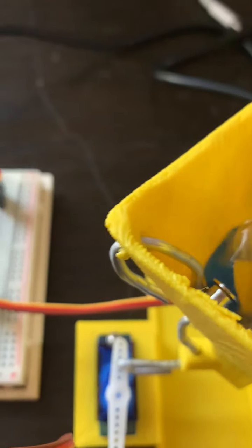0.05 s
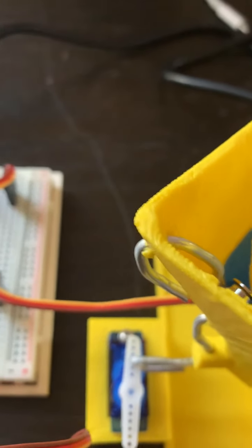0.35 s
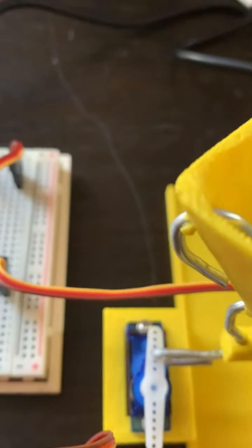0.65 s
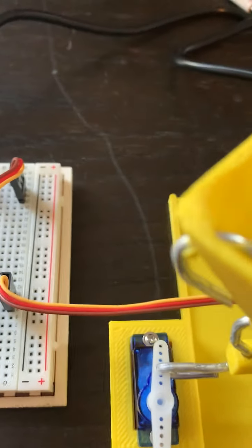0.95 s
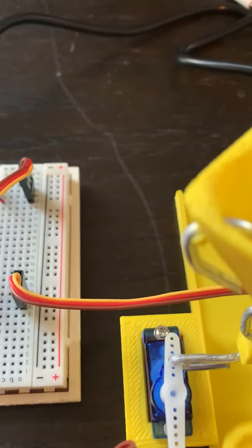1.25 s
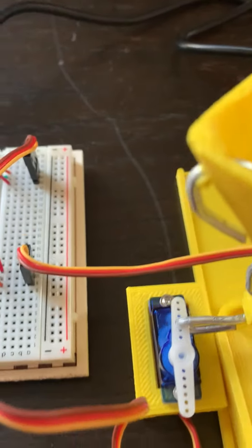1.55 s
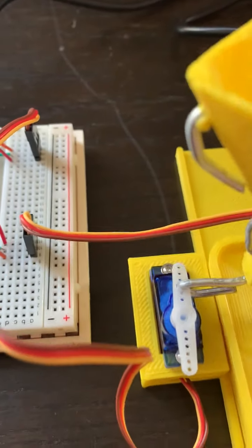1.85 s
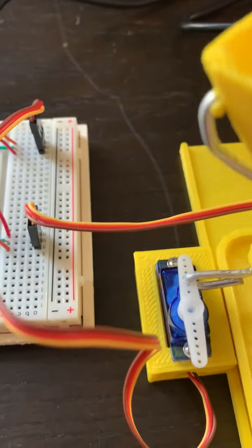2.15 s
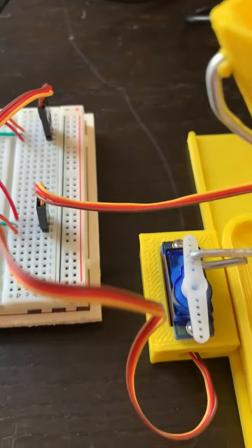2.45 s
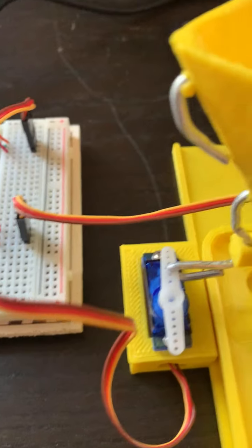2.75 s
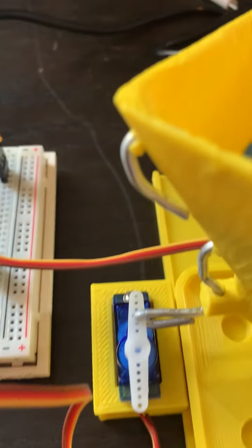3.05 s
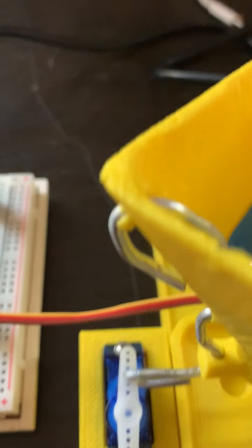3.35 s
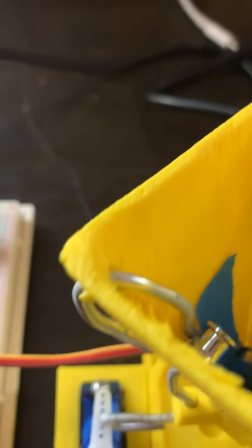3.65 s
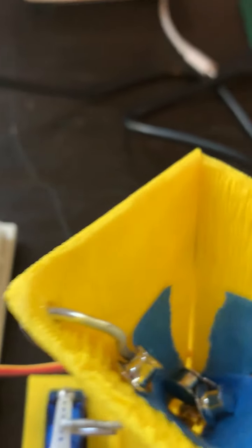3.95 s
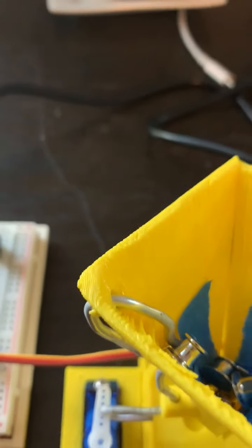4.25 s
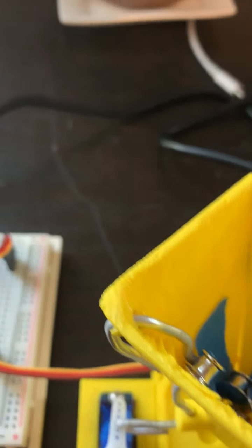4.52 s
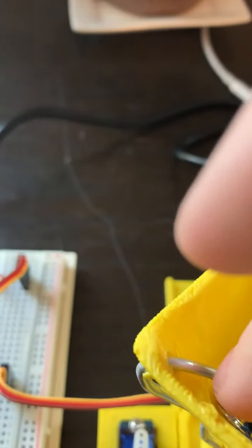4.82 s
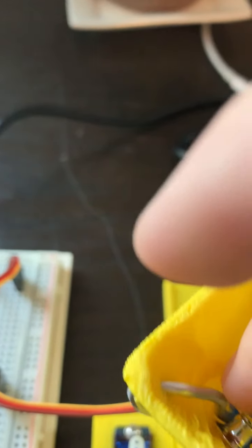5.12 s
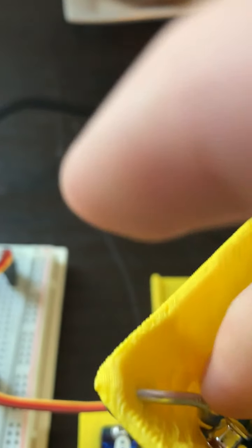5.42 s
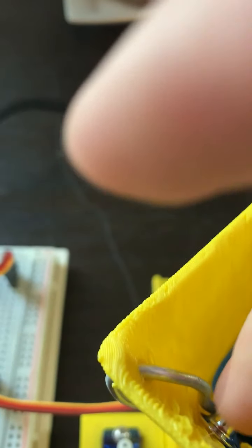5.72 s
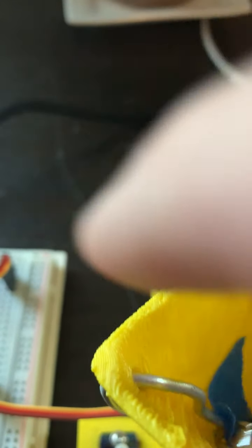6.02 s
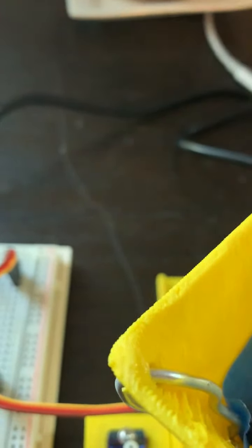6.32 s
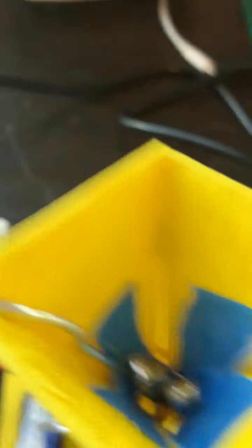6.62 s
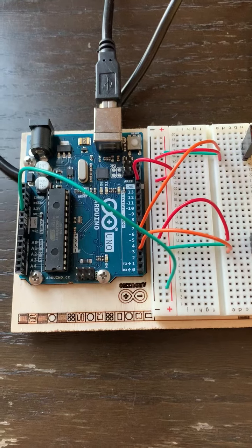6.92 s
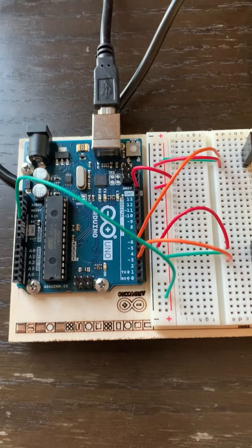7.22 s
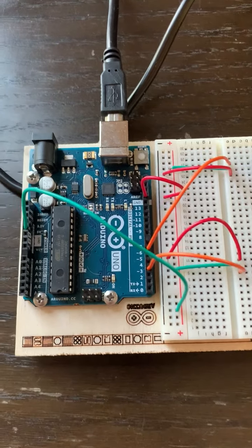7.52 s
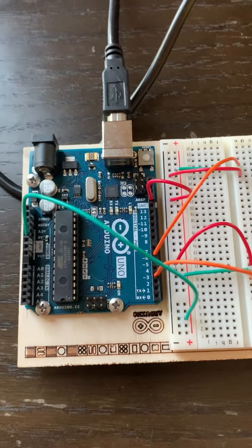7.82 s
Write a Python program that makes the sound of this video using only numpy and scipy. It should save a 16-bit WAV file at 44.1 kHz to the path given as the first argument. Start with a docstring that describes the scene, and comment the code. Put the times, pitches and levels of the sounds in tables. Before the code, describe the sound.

Small metal pins rattle and click sharply against a plastic funnel for the first half second, heard close by in a quiet room with a faint low rumble. Little motors tick softly from about 0.8 seconds, with a bump and scuff at 1.3 and a short gear whir just after. Around 1.9 to 2.4 seconds the pins slide and clink in a bright rush while the base thuds several times. A faint, very high whine runs from about 2 to 6.7 seconds. The gears tick quietly from 2.6 to 3.7, with light scuffs near 2.9 and a few sharp pin clicks at 3.6. Soft rubbing on plastic follows at 4. At about 5.2 seconds a finger stirs the pins in a brief jingling rustle. A few more clicks come around 6, and a last soft motor whir at 7.6.

```python
"""Metal pin backs in a tilting funnel

Small metal pin backs rattle in a printed plastic funnel that little servo motors tilt along a track.
The pins click, knock the funnel wall and slide in a heap, and a finger stirs them. Gears tick, and the
base bumps and scuffs. All is heard close by, in a quiet room with a rumble and a thin whine."""
import sys
import numpy as np
from scipy import signal
from scipy.fft import rfft, irfft, next_fast_len
from scipy.io import wavfile
from scipy.ndimage import map_coordinates

SR = 44100
rng = np.random.default_rng(int(sys.argv[2]) if len(sys.argv) > 2 else 0)


def transcribe(u):
    """Save the signal u as a 16-bit wav file named by the first command-line argument.

    u: samples, shape (n,) or (channels, n), limited to [-1, 1]; the rate is SR.
    q: integer samples, one column per channel.
    """
    v = np.clip(np.atleast_2d(u).T, -1, 1)
    q = np.round(v * 32767).astype(np.int16)
    wavfile.write(sys.argv[1], SR, q)


N = 347011

# The tones a struck pin, funnel and base ring with: f/Hz, level/dB, t60/s (time to fade by 60 dB)
PIN_TONES = [(2594, -9.5, 0.075), (3450, -14, 0.044), (3498, -7.5, .03), (4230, -11, 0.02), (5016, -6, .03),
             (5576, -23, .02), (6783, -0.5, 0.078), (7100, -1, 0.021), (7700, -12, 0.1),
             (7840, -5.5, 0.045), (8120, -2.5, .028), (8540, -8.5, 0.044), (8900, 0.5, 0.029),
             (9900, -2.5, 0.042), (11000, -6.5, 0.011), (14086, -10, 0.011), (15150, -8.5, 0.012)]
FUNNEL_TONES = [(990, -24, 0.013), (1373, -1, 0.048), (1548, 2.5, 0.055), (1632, -3, 0.15),
                (1986, -7.5, 0.25), (2180, 11, 0.017), (2560, -2.5, 0.026)]
BASE_TONES = [(154, -7, .1), (228.7, -2.5, 0.26), (379, 5, 0.065), (420, -11, 0.061), (724.8, -4, 0.035),
              (1014, -6.5, 0.039), (1300, -11.5, 0.027)]
# Noise colours (how strong each pitch is): f/Hz, level/dB
CRACK_COLOUR = [(1500, -24.5), (3000, -9), (4000, 3.5), (6000, 3), (9500, -8), (11000, -4), (12200, -20.5),
                (17000, -41)]  # a pin hitting something
SLIDE_COLOUR = [(400, -20), (1000, -20.5), (2000, -16.5), (3500, -7.5), (4700, -6), (5300, -21.5),
                (6500, -4), (8300, -1.5), (9800, -9.5), (11500, -25), (12700, -30), (14800, -9.5),
                (16500, -28.5)]  # bright sliding over plastic
RUB_COLOUR = [(120, -10.5), (250, 10.5), (450, -7), (750, -4.5), (1100, -9.5), (1900, -5), (3500, -14),
              (5000, -18), (8000, -25), (11000, -32), (13000, -40)]  # soft rubbing on plastic
RUSH_COLOUR = [(80, -24.5), (150, -6), (220, 1), (280, -5.5), (390, -5.5), (460, -12.5), (600, -28),
               (900, -37.5), (1500, -59.5), (3000, -100)]  # a low rush, in the room or the base

SIDES = np.array([[.5], [-.5]])  # splits a difference between left and right
SURGE_T60_S = .06  # how fast a sliding heap jams


def amp(db):
    """Turn decibels into a number to multiply by."""
    return 10 ** (np.asarray(db) / 20)


def unit(x):
    """Scale a sound to an average strength (rms) of 1."""
    return x / np.sqrt(np.mean(x ** 2) + 1e-20)


def unit_start(x, samples):
    """Scale a sound so that its first samples have an average strength of 1."""
    return x / np.sqrt(np.mean(x[:samples] ** 2) + 1e-20)


def along(points, hz):
    """Read between (f/Hz, value) points, with octaves evenly spaced."""
    f, v = np.transpose(points)
    return np.interp(np.log(hz + 1), np.log(f + 1), v)


def wobble(rate):
    """A smooth random curve through `rate` new values a second."""
    return map_coordinates(rng.standard_normal(int(N * rate / SR) + 4), [np.arange(N) * rate / SR])


def filtered(x, response):
    """Multiply each frequency in a sound by response(hz)."""
    n = x.shape[-1]
    padded = next_fast_len(n + 8192)
    return irfft(rfft(x, padded) * response(np.fft.rfftfreq(padded, 1 / SR)), padded)[..., :n]


def coloured(x, colour):
    """Give a sound a colour and an average strength of 1."""
    return unit(filtered(x, lambda hz: amp(along(colour, hz))))


def fade(t, t60):
    """Die away by 60 dB every t60 seconds."""
    return np.exp(-np.log(1000) * t / t60)


def swell(start, length, rise, t60):
    """A loudness curve that rises, holds until start + length and dies away."""
    t = np.arange(N) / SR - start
    return np.clip(t / rise, 0, 1) ** 2 * fade(np.maximum(t - length, 0), t60)


def swells(rows, rise, t60):
    """Join rows of (t/s, length/s, level/dB) into one loudness curve."""
    return np.sqrt(sum((amp(db) * swell(start, length, rise, t60)) ** 2 for start, length, db in rows))


def add(track, start, sound):
    """Mix a sound in, `start` seconds into the track."""
    i = max(round(start * SR), 0)
    track[i:i + len(sound)] += sound[:N - i]


def grains(rate, spread_db):
    """Tiny hits of random size at random times, about `rate` a second."""
    hits = rng.random(N) < rate / SR
    return hits * amp(spread_db * np.clip(rng.standard_normal(N), -2, 2)) * rng.choice([-1, 1], N)


def ring(tones, t, spread_db, detune=0.):
    """Each strike lands on a new spot, so the fading tones vary in strength; detune varies their pitch."""
    hz, db, t60 = np.transpose(tones)[:, :, None]
    size, sign, shift = rng.standard_normal((3, len(tones), 1))
    waves = np.sin(2 * np.pi * hz * (1 + detune * shift) * t)
    return np.sum(np.sign(sign) * amp(db + spread_db * size) * fade(t, t60) * waves, 0)


def resonances(peaks, hz):
    """How a hollow body passes sound: best near its own pitches."""
    return sum((-1) ** k * amp(db) * 1j * hz * width / (centre ** 2 - hz ** 2 + 1j * hz * width)
               for k, (centre, width, db) in enumerate(peaks))


def background():
    """The room rumbles, hums and hisses faintly; the low sounds dip briefly near the end."""
    # Colours of the deep rumble and the airy hiss, then the tones of the hum: f/Hz, level/dB
    rumble_colour = [(15, -42.5), (30, -18), (45, -3.5), (85, -1.5), (130, -2), (180, -10.5), (300, -40.5),
                     (600, -92)]
    hiss_colour = [(500, -6), (1100, -4), (1600, -5.5), (2800, -13), (3700, -8.5), (5200, -16.5),
                   (8000, -10), (10500, -13), (12500, -29.5), (15000, -24), (16500, -27)]
    hum_tones = [(84, -69.5), (121, -72.5), (200, -68.5), (760, -95), (1120, -92)]

    def noise(apart):
        """Left and right noise; a small `apart` makes them nearly alike."""
        return rng.standard_normal(N) + apart * rng.standard_normal((2, N))

    t = np.arange(N) / SR
    lull = swell(6.66, length=.55, rise=.05, t60=1.5)
    rumble_level, rush_level = amp(-62 - 5 * lull), amp(-66.5 - 13 * lull)
    hum = sum(amp(db) * np.sqrt(2) * np.sin(2 * np.pi * hz * t + .78 * wobble(4.5))
              for hz, db in hum_tones)
    rumble = rumble_level * coloured(noise(apart=.2), rumble_colour)
    rush = rush_level * coloured(noise(apart=.12), RUSH_COLOUR)
    hiss = amp(-81.5) * coloured(noise(apart=1), hiss_colour)
    return rumble + rush + hum * unit(rush_level) + hiss


def whine():
    """A thin, very high tone wavers inside a narrow hiss; it starts and stops abruptly."""
    # How loud the whine is over time: t/s, level/dB
    loudness = [(2.05, -62), (2.07, -58.5), (3.15, -62), (3.54, -57.5), (4.92, -62.5), (5.37, -51.5),
                (5.53, -70), (5.77, -72), (6.47, -71), (6.55, -67.5)]
    t = np.arange(N) / SR
    tone = np.sqrt(2) * np.sin(2 * np.pi * 15652 * t + .7 * wobble(25))
    hiss = unit(filtered(rng.standard_normal(N), lambda hz: np.exp(-((hz - 15550) / 200) ** 2)))
    level = amp(np.interp(t, *np.transpose(loudness))) * swell(1.9, length=4.76, rise=.02, t60=.05)
    return level * (amp(-.5) * tone * amp(1.3 * wobble(12)) + amp(-4.5) * hiss)


def servos():
    """Gear teeth tick unevenly through the motor housing while plastic rubs and the base drones."""
    # Motor moves (slow ones are dull): t/s, length/s, gears/dB, rubbing/dB, drone/dB, brightness/Hz
    moves = [(0.77, 0.087, -73.5, -73, -68, 5400), (0.996, 0.086, -82.5, -87, -82, 5323),
             (1.438, 0.24, -59.5, -68, -60.5, 4880), (2.602, 0.29, -68.5, -87, -67.5, 2600),
             (2.865, 0.43, -61.5, -83.5, -60.5, 5900), (3.38, 0.32, -72.5, -95, -65, 1600),
             (7.608, 0.32, -66, -95, -64, 5940)]
    # Pitches that a housing strengthens: f/Hz, width/Hz, level/dB
    main_housing = [(746, 130, -7.5), (1290, 230, -5), (1780, 260, -1.5), (2088, 380, -5), (2550, 280, -1),
                    (3514, 100, 1.5), (3760, 230, -2), (4450, 1700, -11.5)]  # the servo under the funnel
    last_housing = [(1200, 230, -25), (1860, 70, 6.5), (2670, 210, 1.5), (3500, 330, 5.5), (4200, 160, 1),
                    (4560, 220, -6)]  # the servo that starts last
    out, t = np.zeros(N), np.arange(N) / SR
    teeth = grains(rate=720, spread_db=1)
    slips = coloured(grains(rate=2700, spread_db=4.5), SLIDE_COLOUR)
    drone = coloured(rng.standard_normal(N), RUSH_COLOUR)
    for k, (start, length, gears_db, rub_db, drone_db, bright_hz) in enumerate(moves):
        housing = last_housing if k == len(moves) - 1 else main_housing
        ticks = filtered(teeth, lambda hz: resonances(housing, hz))
        gears = unit(filtered(ticks, lambda hz: 1 / (1 + (hz / bright_hz) ** 8)))
        jolt = amp(5.5 * np.exp(-np.abs(t - start) / .04))  # louder while taking up the load
        level = swell(start, length, rise=.013, t60=.58) * jolt
        out += level * (amp(gears_db) * gears + amp(rub_db) * slips + amp(drone_db) * drone)
    return out * amp(1.5 * wobble(32))


def rubs():
    """Soft rubbing on the plastic is made of many tiny slips."""
    # The funnel settles, then the finger arrives: t/s, length/s, level/dB
    drags = [(4.015, 0.097, -57.5), (5.01, 0.017, -64.5)]
    return swells(drags, rise=.027, t60=.39) * coloured(grains(rate=2600, spread_db=2.5), RUB_COLOUR)


def bumps():
    """Each bump is a short scuff and a quick run of small contacts that sets the base thudding."""
    # Bumps and scuffs, mostly from the carriage; the last is a faint handling tap as the whine stops:
    # t/s, thud/dB, scuff/dB, scuff t60/s, brightness/Hz
    hits = [(1.306, -37, -36, 0.31, 14180), (1.815, -47.5, -51.5, 0.07, 12000),
            (1.931, -37.5, -23, 0.074, 7200), (2.097, -41.5, -69, 0.047, 2000),
            (2.175, -37, -41, 0.087, 4070), (2.197, -32.5, -27.5, 0.17, 4520),
            (2.212, -26.5, -38, 0.081, 1500), (2.418, -37.5, -53.5, 0.04, 900),
            (2.874, -64, -50.5, 0.037, 14160), (2.946, -72, -49, 0.073, 2490),
            (2.973, -63, -47, 0.068, 5230), (5.869, -82, -69.5, 0.12, 2800),
            (6.661, -64, -71, 0.035, 12100)]
    # Colour of the scuff: f/Hz, level/dB
    scuff_colour = [(300, -17), (800, -12.5), (1400, -1), (1900, 3.5), (2500, -5), (3400, -2), (5000, -8.5),
                    (8000, -12.5), (11000, -16), (12500, -30), (15000, -32)]
    out, t = np.zeros(N), np.arange(SR // 3) / SR
    for start, thud_db, scuff_db, t60, bright_hz in hits:
        push = rng.standard_normal(len(t)) * fade(t, .026)
        base = ring(BASE_TONES, t, spread_db=1.5, detune=.005)
        shudder = unit_start(signal.fftconvolve(push, base)[:len(t)], 800)
        strike = unit_start(base * (1 - np.exp(-t / .00041)), 800)
        thud = unit_start(strike + amp(2) * shudder, 800)
        noise = filtered(rng.standard_normal(len(t)),
                         lambda hz: amp(along(scuff_colour, hz)) / (1 + (hz / bright_hz) ** 4))
        scuff = unit_start(noise * fade(t, t60) * (1 - np.exp(-t / .001)), 300)
        add(out, start, amp(thud_db) * thud + amp(scuff_db) * scuff)
    return out


def clinks(spans, rate, centre_hz, octaves, t60):
    """Moving pins clink at random, each at its own pitch, from the first span to just past the last."""
    out, t = np.zeros(N), np.arange(SR // 25) / SR
    last_start, last_length = spans[-1][:2]
    start, end = spans[0][0], last_start + last_length + SURGE_T60_S
    for when, pitch, softness in rng.random((int(rate * (end - start)), 3)):
        hz = centre_hz * 2 ** (octaves * (2 * pitch - 1))
        clink = np.sin(2 * np.pi * hz * t) * fade(t, t60) * (1 - np.exp(-t * hz / 2))
        add(out, start + when * (end - start), amp(-10 * softness) * clink)
    return out


def slides():
    """Sliding pins chatter over ridged plastic: tiny hits ring the metal, and rims catch with a clink."""
    # Surges of the heap: t/s, length/s, level/dB
    tips = [(1.902, 0.056, -26.5), (1.973, 0.032, -31.5), (2.065, 0.054, -34), (2.111, 0.046, -30.5)]  # the funnel tips
    stirs = [(5.149, 0.067, -33), (5.201, .036, -23), (5.31, .05, -26.5)]  # the finger pushes through
    # Colour of the stirred pins: f/Hz, level/dB
    stir_colour = [(500, -30.5), (1000, -24.5), (1450, -18.5), (1850, -24), (2500, -8), (3200, -15),
                   (4000, 0), (4700, -12.5), (5600, 0), (6500, -6), (8100, 1), (9300, -9), (11300, -8),
                   (12700, -29), (14500, -2.5), (16500, -30)]
    out = np.zeros(N)
    metal = ring(PIN_TONES, np.arange(SR // 20) / SR, spread_db=1)
    for surges, colour in ((tips, SLIDE_COLOUR), (stirs, stir_colour)):
        chatter = coloured(grains(rate=3200, spread_db=2.5), colour)
        ringing = unit(signal.oaconvolve(chatter, metal)[:N])
        catches = clinks(surges, rate=260, centre_hz=2800, octaves=1.3, t60=.028)
        trickle = swells(surges, rise=.028, t60=.35)  # stray pins run on after each surge
        flow = swells(surges, rise=.028, t60=SURGE_T60_S) + amp(-11.5) * trickle
        out += flow * (amp(-2) * chatter + amp(-10.5) * ringing + amp(-4) * catches)
        # the shifting weight rumbles in the base
        out += amp(-27.5) * trickle * coloured(rng.standard_normal(N), RUSH_COLOUR)
    return out * amp(1.5 * wobble(110))


def jostle():
    """Between the first loud clicks the shaken pins touch each other, tap the wall and scrape over it."""
    shake_s, calm_db_per_s = .55, 28
    t = np.arange(SR // 16) / SR
    touches = grains(rate=600, spread_db=4.5)
    metal = unit(signal.oaconvolve(touches, ring(PIN_TONES, t, spread_db=1))[:N])
    wall = unit(signal.oaconvolve(touches, ring(FUNNEL_TONES, t, spread_db=1))[:N])
    taps = clinks([(0, shake_s)], rate=260, centre_hz=1800, octaves=.45, t60=.02)
    scrape = amp(-3) * coloured(touches, CRACK_COLOUR) + amp(-12) * coloured(touches, RUB_COLOUR)
    level = amp(-35.5 - calm_db_per_s * np.arange(N) / SR) * swell(0, shake_s, rise=.0023, t60=.37)
    return level * (amp(-8) * metal + amp(-5) * wall + amp(7.5) * taps + scrape)


def pin_contacts():
    """A pin lands on one rim and slaps down more softly on the other a moment later."""
    # Pins landing in the funnel: t/s, metal ring/dB, sharp snap/dB, wall knock/dB, wall pitch/Hz
    landings = [(0.01, -25.5, -35, -30, 1830), (0.044, -35.5, -49.5, -23.5, 2000),
                (0.0581, -28.5, -38, -19.5, 1980), (0.0688, -31, -39.5, -16.5, 1790),
                (0.0762, -20.5, -31.5, -11, 1780), (0.0868, -16.5, -23, -10.5, 2010),
                (0.095, -13.5, -24, -21, 1650), (0.1101, -14, -23.5, -30, 1730),
                (0.151, -24.5, -37, -28.5, 1510), (0.164, -32, -31.5, -26, 1610),
                (0.185, -42, -52.5, -32, 1694), (0.1999, -18.5, -32.5, -21, 1850),
                (0.2362, -33, -37, -30.5, 1816), (0.2432, -23, -25, -29, 1744),
                (0.259, -11, -19.5, -24.5, 1869), (0.2662, -28.5, -33, -14, 2172),
                (0.283, -39.5, -50, -26.5, 1998), (0.297, -31, -36, -40.5, 2130),
                (0.3305, -26, -31, -36, 1930), (0.3626, -35, -38, -41.5, 1820),
                (0.3746, -31.5, -37, -31.5, 1562), (1.9632, -23.5, -27.5, -15.5, 1964),
                (2.051, -29, -42, -54, 2210), (2.071, -30.5, -51, -64, 1740),
                (3.58, -37.5, -34.5, -22.5, 1527), (3.593, -37, -40, -26, 1390),
                (3.6056, -21.5, -16, -25, 1650), (3.728, -47.5, -40.5, -44, 1500),
                (6.003, -32, -57, -43.5, 1640), (6.048, -41.5, -46, -59, 1554),
                (6.0894, -31, -21, -29.5, 1474)]
    delays = .0035 * (1 + .2 * rng.uniform(-1, 1, len(landings)))
    for (start, ring_db, snap_db, knock_db, wall_hz), delay in zip(landings, delays):
        yield start, ring_db, snap_db, knock_db, wall_hz
        yield start + delay, ring_db - 12, snap_db - 12, knock_db - 7, wall_hz


def wall_knock(t, wall_hz):
    """The struck patch of wall swings briefly, the whole funnel rings on and the base shakes a little."""
    overtone = amp(-9) * np.sin(2 * np.pi * 2420 * t)
    give = 1 - np.exp(-(t / .0008) ** 2)  # the plastic gives way, so the knock starts softly
    patch = unit_start((np.sin(2 * np.pi * wall_hz * t) + overtone) * fade(t, .012) * give, 150)
    funnel = unit_start(ring(FUNNEL_TONES, t, spread_db=3, detune=.008) * give, 150)
    base = unit_start(ring(BASE_TONES, t, spread_db=2.5) * give, 600)
    return unit_start(patch + amp(-10) * funnel, 150) + amp(-40.5) * base


def pin_clicks():
    """Each contact makes a sharp burst of noise, rings the pin and knocks the funnel wall."""
    # Colour of metal edge snapping on metal edge: f/Hz, level/dB
    snap_colour = [(6000, -21), (10500, -2.5), (12700, -18), (14500, 4), (15800, -2.5), (17000, -21)]
    out, t = np.zeros(N), np.arange(SR // 12) / SR
    damping = fade(t, .024) + .18  # neighbours in the heap soon muffle most of the ring
    for start, ring_db, snap_db, knock_db, wall_hz in pin_contacts():
        crack = unit_start(coloured(rng.standard_normal(len(t)), CRACK_COLOUR) * fade(t, .012), 130)
        snap = unit_start(coloured(rng.standard_normal(len(t)), snap_colour) * fade(t, .0054), 130)
        metal = unit_start(ring(PIN_TONES, t, spread_db=5, detune=.015) * damping, 130)
        tick = unit_start((metal + crack) * (1 - np.exp(-t / .00064)), 130)
        add(out, start, amp(ring_db) * tick + amp(snap_db) * snap + amp(knock_db) * wall_knock(t, wall_hz))
    return out


def early_echoes(x):
    """Sound bounces off the funnel and the desk, each echo arriving from its own side."""
    # Echoes: delay/s, level/dB, head start on the left/s
    echoes = [(.0009, -12.5, .00003), (.0021, -11, -0.0037), (.0034, -9.5, .00024), (.0052, -10, -0.0049)]
    return filtered(x, lambda hz: sum(amp(db) * np.exp(-2j * np.pi * hz * (delay - lead * SIDES))
                                      for delay, db, lead in echoes))


def room(x):
    """The walls answer with a smooth tail of echoes; the highest treble dies first."""
    # How long the room rings: f/Hz, t60/s
    ring_times = [(200, .26), (1000, 0.31), (2500, 0.64), (8000, 0.48), (11000, 0.38), (15000, 0.11)]
    # Colour of the tail: f/Hz, level/dB
    tail_colour = [(100, -2.5), (600, 18.5), (2000, -5.5), (8500, -8), (11000, -11.5), (13000, -11.5),
                   (16000, -8)]
    hz, t, bands = signal.stft(rng.standard_normal((2, SR)), SR, nperseg=256)
    bands = bands * fade(t, along(ring_times, hz)[:, None]) * amp(along(tail_colour, hz))[:, None]
    tail = signal.istft(bands, SR, nperseg=256)[1]
    tail *= 1 - np.exp(-np.arange(tail.shape[1]) / SR / .011)  # echoes take a moment to build up
    return signal.fftconvolve(x[None], tail / np.linalg.norm(tail[0]), axes=1)[:, :N]


def placed(x, left_lead_s):
    """A sound reaches the nearer side a little sooner."""
    return filtered(x, lambda hz: np.exp(2j * np.pi * hz * left_lead_s * SIDES))


def scene():
    """The machine stands close by: the funnel a little to the left, the servos to the right."""
    parts = np.array([pin_clicks() + jostle() + slides() + bumps() + rubs(), servos()])
    # such small parts give off almost no bass
    funnel, motors = filtered(parts, lambda hz: (1j * hz / (1j * hz + 70)) ** 2)
    machine = funnel + motors
    direct = placed(funnel + whine(), left_lead_s=.00012) + placed(motors, left_lead_s=-.00013)
    return direct + amp(-4.5) * early_echoes(machine) + amp(-14) * room(machine) + background()


def record(dry):
    """The right microphone hears more of the lower middle pitches; both lose the very top treble."""
    # How much louder the left side is: f/Hz, level/dB
    left_louder = [(60, -1), (150, -0.5), (350, -4), (1300, -2), (2300, 0.5), (4000, 0)]
    # How far the left wave runs ahead: f/Hz, phase/rad
    left_ahead = [(100, -0.2), (400, -.9), (1850, -0.11), (3900, -1.05), (8000, -.25), (15600, -0.4)]
    top_hz = 16100
    balance = lambda hz: amp(along(left_louder, hz) * SIDES)
    phase = lambda hz: np.exp(1j * along(left_ahead, hz) * SIDES)
    return filtered(dry, lambda hz: balance(hz) * phase(hz) / (1 + (hz / top_hz) ** 90))


dry = scene()
out = record(dry)
transcribe(out)
```